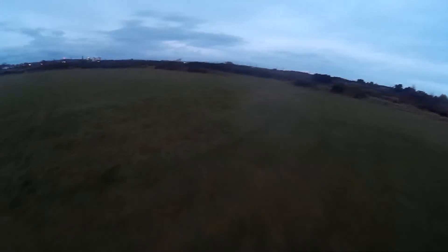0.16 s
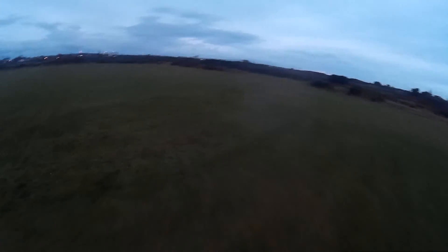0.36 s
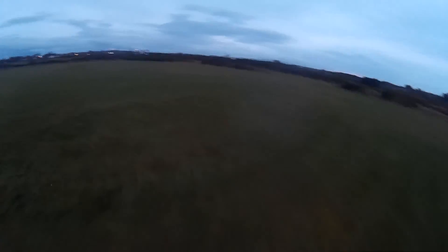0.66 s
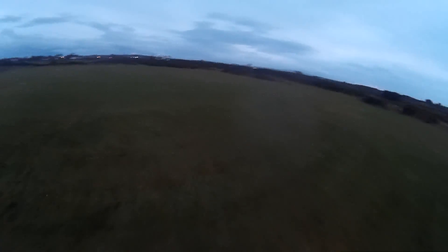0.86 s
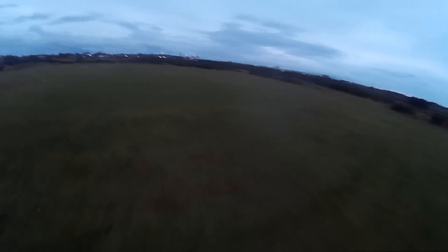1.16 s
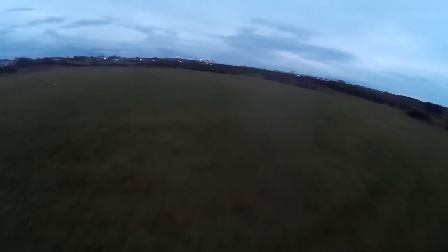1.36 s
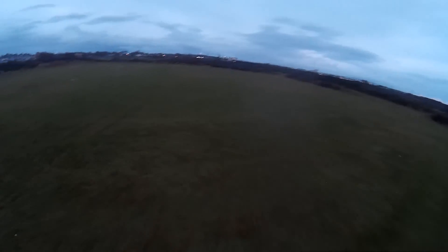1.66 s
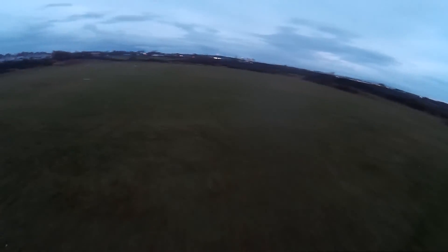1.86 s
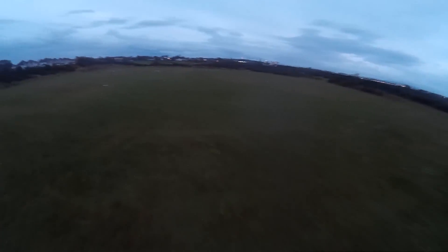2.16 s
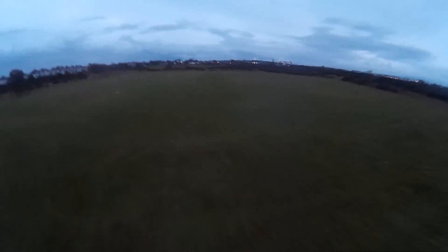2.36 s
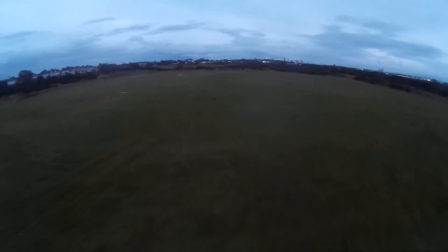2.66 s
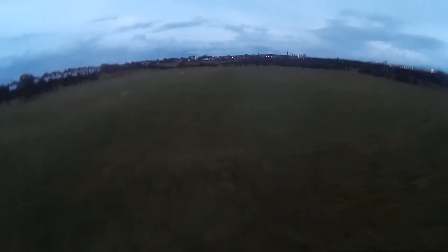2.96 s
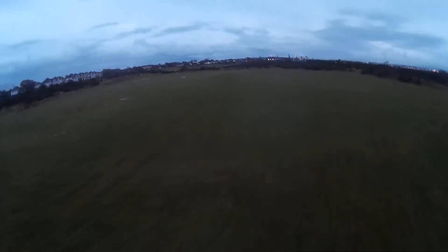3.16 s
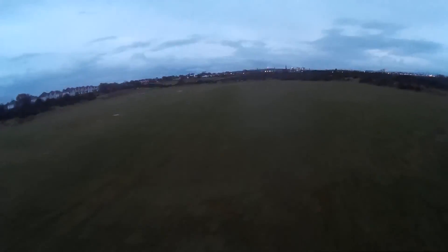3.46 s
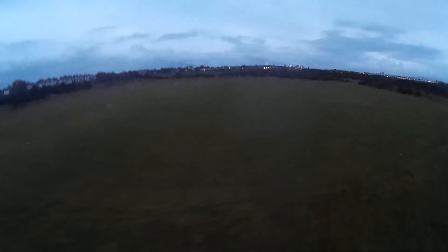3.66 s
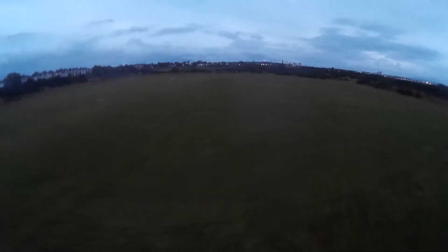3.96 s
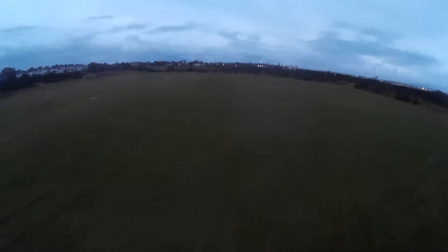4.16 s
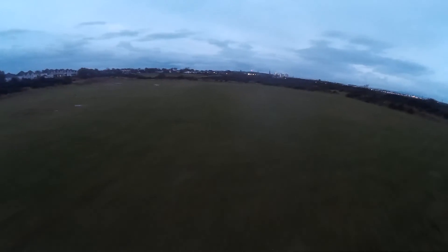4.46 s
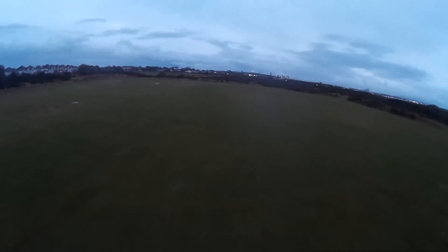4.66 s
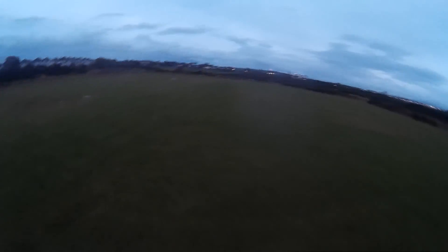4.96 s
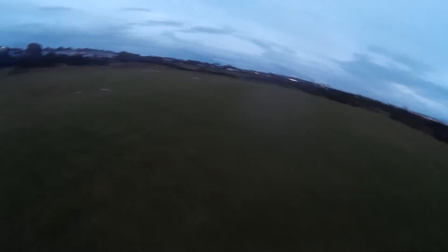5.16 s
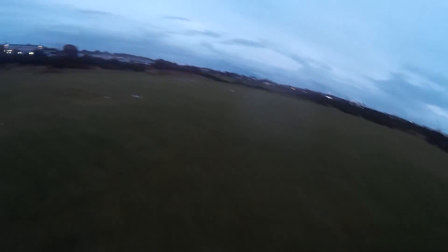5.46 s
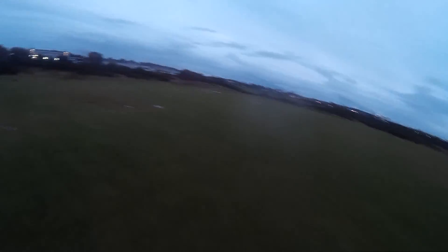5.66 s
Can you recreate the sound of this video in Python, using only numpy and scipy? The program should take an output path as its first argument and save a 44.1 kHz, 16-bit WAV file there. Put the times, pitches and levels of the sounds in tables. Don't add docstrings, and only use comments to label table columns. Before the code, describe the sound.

A small quadcopter flies over an open field, heard from its onboard microphone. Four rotors hum together at slightly different low pitches, beating and buzzing. The pitches spread apart during a turn as wind rumble grows, then close up as the gust drops. Small dry ticks and rattles of the camera mount run throughout, with airy propeller wash, very faint high electronic whine and two barely audible brief whistles.

```python
import sys
import numpy as np
from scipy import signal
from scipy.fft import rfft, irfft
from scipy.io import wavfile
from scipy.ndimage import uniform_filter1d

SR = 44100
rng = np.random.default_rng(int(sys.argv[2]) if len(sys.argv) > 2 else 0)


def waveform_to_disk(signal):
    frames = np.transpose(np.atleast_2d(signal))
    scaled = np.clip(frames, -1, 1) * 32767
    samples = np.round(scaled).astype(np.int16)
    wavfile.write(sys.argv[1], SR, samples)


def gain_from_db(level_db):
    decades = np.asarray(level_db, float) / 20
    return 10 ** decades


N = 256650
T = np.arange(N) / SR

# time in seconds, rate in Hz.
FRONT_LEFT = [(0, 199.7), (.5, 202.6), (.8, 208), (1.2, 208.4), (1.5, 201.8), (1.7, 212), (1.9, 216.4),
              (2.2, 213.2), (2.6, 215.3), (2.8, 221.7), (3.02, 214.5), (3.25, 219.6), (3.45, 212.5),
              (4.13, 213.7), (4.4, 205), (4.87, 197.9), (5.33, 210.5), (5.82, 204)]
FRONT_RIGHT = [(0, 203.1), (0.549, 206.9), (0.719, 201.3), (1.05, 196.3), (1.22, 198.7), (1.5, 195.6),
               (1.72, 197.5), (2.22, 184.8), (2.7, 186.7), (2.92, 181.8), (3.2, 181.6), (3.55, 186.9),
               (4.02, 189.1), (4.4, 207.3), (4.9, 208), (5.12, 203.5), (5.4, 212.9), (5.82, 204.7)]
REAR_LEFT = [(0, 178.5), (.4, 183.3), (.6, 184.6), (.9, 181.1), (1.1, 182), (1.45, 176.5), (1.7, 184.8),
             (1.92, 183), (2.4, 171.8), (2.82, 181.4), (3.28, 167.7), (3.7, 175.3), (4.02, 180.3),
             (4.3, 175.5), (4.62, 181.5), (4.87, 179.2), (5.15, 183.7), (5.82, 171.2)]
REAR_RIGHT = [(0, 148.7), (.3, 146.7), (.6, 151.5), (.8, 152), (1.12, 154.9), (1.45, 148.6), (1.701, 160.7),
              (2.252, 160.3), (2.45, 165.7), (2.7, 167.8), (3.15, 166.8), (3.6, 162.6), (3.9, 163.4),
              (4.102, 165.9), (4.32, 153), (4.649, 143.4), (5.35, 150.5), (5.82, 142.7)]
# cruise rate in Hz, lowest tone in dB, its gain with speed in dB per Hz,
# slap of the overtones in dB, slap lost in a gust in dB.
ROTORS = [
    (208, -23.5, -0.09, -27.5, 1.5),
    (202, -30.5, 0.08, -35.5, 3),
    (176.4, -28.5, 0.11, -31, 2),
    (155, -33.5, 0.08, -35.5, -0.5),
]
# overtones 2 to 7, in dB relative to its slap.
OVERTONES = [
    (-7, -5, -4.5, -13.5, -22.5, -20.5),
    (-7, -4, -2.5, -7.5, -11, -21.5),
    (-1, -4, -12.5, -30.5, -31, -30.5),
    (-9, -11.5, -3, -11, -13.5, -12),
]
# shaft orders 1, 3, 5 and 7 of one rotor, in dB.
UNBALANCE = [
    (-36, -67, -48, -49),
    (-43, -47.5, -45, -44),
    (-47, -49.5, -43.5, -43),
    (-52, -45.5, -47.5, -67.5),
]
# time in seconds, overtone lift in dB.
BITE = [(0, 1), (.45, -0.7), (.75, 2.9), (1.0, -0.6), (1.5, 2.1), (1.9, -0.5), (2.5, 0), (3.1, -2.7),
        (3.7, 0.3), (4.0, -2), (4.22, 0.5), (4.5, 2.8), (4.75, 2), (5.1, 0.7), (5.4, 4), (5.82, 0)]
BITE_SHARE = (1.16, 0.83, 0.5, 0.53)
# time in seconds, wind buffet in dB, blade wash in dB.
AIR = [
    (0.0, -42, -39.5),
    (0.1, -45, -36.5),
    (0.6, -37, -35),
    (1.38, -37.5, -34.5),
    (1.51, -32.5, -34),
    (2.9, -28, -35.5),
    (4.12, -32, -35),
    (4.28, -40.5, -35.5),
    (5.82, -47, -33.5),
]
# frequency in Hz, density in dB per Hz.
BUFFET = [(20, -5.5), (50, 2.5), (100, 2), (160, 1), (250, -4.5), (400, -5), (700, -38), (1200, -32),
          (2000, -59)]
WASH = [(40, -20.5), (120, -10.5), (250, -10.5), (450, -7.5), (700, -0.5), (1000, -4.5), (1400, -9),
        (2000, -16), (2500, -20.5), (3000, -32.5), (4000, -42), (6000, -63)]
HISS = [(3000, -32.5), (5000, 0.5), (6500, -6), (8500, -6), (9800, -7), (10500, 0.5), (11800, -3.5),
        (13300, -14), (14500, -9.5), (15800, -17)]
# frequency in Hz, width in Hz, level in dB.
CASE = [
    (3410, 430, 1),
    (4390, 330, -3),
    (4640, 250, -2),
    (6200, 2800, -22),
]
# time in seconds, peak in dB.
KNOCKS = [(.2263, -34), (0.5116, -30), (.8534, -30), (0.9082, -33), (1.1735, -31), (1.218, -33),
          (1.347, -31), (1.4824, -34), (1.6004, -32), (1.6771, -30), (2.023, -33), (2.2473, -30),
          (2.3726, -33), (2.3956, -27), (2.4079, -31), (2.5922, -31), (2.6092, -30), (3.0412, -33),
          (3.6909, -29), (3.7808, -31), (3.8818, -29), (4.0869, -34), (4.2764, -29), (4.3369, -31),
          (4.6628, -29), (4.6814, -28), (4.8925, -28), (4.8983, -27.5), (5.0573, -33), (5.5741, -32)]
# time in seconds, how much more often it taps in dB.
LOOSE = [(0, -6), (.22, 0), (.55, -7), (.8, 2), (1.3, 5), (1.75, -5.5), (1.95, 6), (2.12, -1), (2.3, 6.5),
         (2.62, 6.5), (2.9, -4), (3.3, 4), (3.7, 5.5), (3.95, -6), (4.7, 2.5), (5.17, -7), (5.4, 6),
         (5.82, -1)]
# start and length in seconds, first and last pitch in Hz, level in dB.
WHISTLES = [
    (3.32, .17, 4740, 4780, -52),
    (5.7, .16, 4810, 4770, -54),
]
# pitch in Hz, second at which it swings in step with the first, level and octave level in dB.
WHINE_HZ, IN_STEP = (7819.89, 7824.68, 7823.47, 7811.85), (0, .119, .242, .072)
WHINE_DB, OCTAVE_DB = (-69.3, -69, -80, -78.5), (-92, -102, -88, -94)
ARM_HZ, ARM_WIDTH_HZ, ARM_DB = 586, 17, (0.5, 10.5, 0.3, 3)
HUNT_S, HUNT_PER_S, HUNT_HZ = 4.43, 5.15, 3.5
WANDER_DB, WANDER_HZ = 1.08, 1.9
TAP_CHANCE, TAP_DB, TAP_SPREAD_DB = .16, -41, 3.5
HISS_DB = -63


def evened(x):
    return x / np.sqrt(np.mean(x ** 2) + 1e-20)


def column(values):
    return np.array(values)[:, None]


def curves(rows):
    s, *columns = np.transpose(rows)
    return np.array([np.interp(T, s, c) for c in columns])


def drift(top_hz, count):
    steps = rng.standard_normal((count, N // 64 + 2))
    length = steps.shape[1]
    z = rfft(steps) / (1 + (np.fft.rfftfreq(length, 64 / SR) / top_hz) ** 4)
    s = np.arange(length) * 64 / SR
    return np.array([np.interp(T, s, evened(v)) for v in irfft(z, length)])


def noise(spectrum, patchy_db, size=1024):
    hz = np.fft.rfftfreq(size, 1 / SR)
    f, db = np.transpose(spectrum)
    a, b, patches = rng.standard_normal((4 * N // size + 5, len(hz), 3)).T
    patches = evened(uniform_filter1d(uniform_filter1d(patches, 10, 0), 10, 1))
    colour_db = np.interp(np.log(hz + 1), np.log(f + 1), db, left=-60, right=-120)
    z = (a + 1j * b) * gain_from_db(colour_db[:, None] + patchy_db * patches)
    return signal.istft(z, nperseg=size, noverlap=size * 3 // 4)[1][:N]


def band_rms(x, lo, hi):
    return np.std(signal.sosfilt(signal.butter(4, [lo, hi], "band", fs=SR, output="sos"), x))


def speeds():
    hunting = HUNT_HZ * np.sin(2 * np.pi * HUNT_PER_S * np.maximum(T - HUNT_S, 0))
    rates = np.vstack([curves(rows) for rows in (FRONT_LEFT, FRONT_RIGHT, REAR_LEFT, REAR_RIGHT)])
    return rates + hunting * column([0, 1, 0, 0])


def loads(rates, gust):
    cruise_hz, tone_db, db_per_hz, slap_db, lost_db = np.transpose(ROTORS)[:, :, None]
    wander_db = WANDER_DB * drift(WANDER_HZ, count=8)
    thrust = tone_db + db_per_hz * (rates - cruise_hz) + wander_db[:4]
    slap = slap_db + column(BITE_SHARE) * curves(BITE) - lost_db * gust + wander_db[4:]
    return thrust, slap


def blade_tones(rates, turns, gust):
    thrust, slap = loads(rates, gust)
    orders = np.r_[1:8, .5:4][:, None]
    out = np.zeros(N)
    for k in range(4):
        overtones_db = slap[k] + column(OVERTONES[k]) - gust * column([.3, -1.2, 3.6, 2.6, 2.6, 2.6])
        unbalance_db = column(UNBALANCE[k]) + 2.3 * gust
        level_db = np.vstack([thrust[k] - .4, overtones_db, unbalance_db])
        level_db = level_db + ARM_DB[k] / (1 + ((orders * rates[k] - ARM_HZ) / ARM_WIDTH_HZ) ** 2)
        flicker_db = (0.58 + 0.3 * gust) * np.minimum(orders, 2) * drift(10.8, count=11)
        shake = .03 * drift(6.0, count=1)
        blur = (.01 + .008 * gust) * drift(12.0, count=11)
        phase = (turns[k] + shake) * orders + rng.random((11, 1)) + blur
        out += np.sqrt(2) * (gain_from_db(level_db + flicker_db) * np.cos(2 * np.pi * phase)).sum(0)
    return out


def wake_tones(turns):
    pairs = np.array([turns[a] + turns[b] for a, b in ((0, 1), (0, 2), (1, 2), (0, 3), (2, 3))])
    level_db = column([-42, -42, -46, -46, -47]) + 2.0 * drift(7.3, count=5)
    tones = gain_from_db(level_db) * np.cos(2 * np.pi * (pairs + rng.random((5, 1))))
    return np.sqrt(2) * tones.sum(0)


def chop(turns, depth):
    sweeps = column([1, .7, .8, .5]) * np.cos(2 * np.pi * turns)
    return evened(np.exp(depth * sweeps.sum(0)))


def airflow(turns):
    buffet_db, wash_db = curves(AIR)
    buffet = noise(BUFFET, 0.91, size=2048)
    buffet *= gain_from_db(buffet_db + drift(3.0, count=1)[0]) / band_rms(buffet, 21, 87.0)
    wash = noise(WASH, 1.0)
    wash *= gain_from_db(wash_db - 0.6) * chop(turns, depth=0.1) / band_rms(wash, 1097, 3100)
    hiss = evened(noise(HISS, .7, size=512)) * chop(turns, depth=0.11)
    return buffet + wash + gain_from_db(HISS_DB + .4 * drift(3.0, count=1)[0]) * hiss


def whine(turns):
    out = np.zeros(N)
    for k, rotor in enumerate((2, 0, 1, 3)):
        phase = 2 * np.pi * (WHINE_HZ[k] * T - (WHINE_HZ[k] - WHINE_HZ[0]) * IN_STEP[k])
        turning = 1 + 0.33 * np.cos(2 * np.pi * turns[rotor]) + .25 * np.cos(np.pi * turns[rotor])
        out += turning * (gain_from_db(WHINE_DB[k]) * np.cos(phase) + gain_from_db(OCTAVE_DB[k]) * np.cos(2 * phase))
    return out


def case(x):
    out = np.zeros(N)
    for k, (hz, width, db) in enumerate(CASE):
        r = np.exp(-np.pi * width / SR)
        angle = 2 * np.pi * hz / SR
        ring = signal.lfilter([np.sin(angle)], [1, -2 * r * np.cos(angle), r * r], x)
        out += (-1) ** k * gain_from_db(db) * ring
    return out


def taps(turns, spells):
    passing = np.diff(np.floor(turns), prepend=0) > 0
    struck = passing * (rng.random(N) < TAP_CHANCE * spells)
    return gain_from_db(TAP_DB + TAP_SPREAD_DB * rng.standard_normal(N)) * struck


def mount_tick():
    t = np.arange(-100, 101) / SR
    width = np.where(t < 0, .00021, .0003)
    body = np.exp(-.5 * (t / width) ** 2) * np.cos(2 * np.pi * 4200 * t)
    edge = np.exp(-.5 * (t / 0.00015) ** 2) * np.cos(2 * np.pi * 6700 * t)
    return body + gain_from_db(-19.0) * edge


def rattle(turns):
    knocks = np.zeros(N)
    for s, db in KNOCKS:
        knocks[round(s * SR)] = gain_from_db(db - 1.3)
    spells = gain_from_db(curves(LOOSE)[0]) * np.exp(0.25 * drift(14.0, count=1)[0])
    faint = gain_from_db(-54 + 2.9 * np.minimum(rng.exponential(1, N), 3.5))
    faint = faint * (rng.random(N) < 520 * spells ** .6 / SR)
    ticks = signal.oaconvolve(knocks + taps(turns[2], spells) + faint, mount_tick(), "same")
    air = gain_from_db(-65.5 + 1.5 * drift(28.0, count=1)[0]) * chop(turns, depth=0.21) * rng.standard_normal(N)
    rung = signal.sosfilt(signal.butter(3, 2700, "high", fs=SR, output="sos"), case(air))
    return rung + ticks


def whistles():
    out = np.zeros(N)
    for s, length, hz, end_hz, db in WHISTLES:
        u = np.clip((T - s) / length, 0, 1)
        pitch = hz + (end_hz - hz) * u + 2.3 * drift(30.0, count=1)[0]
        out += gain_from_db(db) * np.sin(np.pi * u) ** 0.52 * np.cos(2 * np.pi * np.cumsum(pitch) / SR)
    return out


def scene():
    rates = speeds()
    turns = np.cumsum(rates, 1) / SR
    gust = np.clip((curves(AIR)[0] + 38) / 10, 0, 1.5)
    tones = blade_tones(rates, turns, gust) + wake_tones(turns) + whine(turns)
    mix = tones + airflow(turns) + rattle(turns) + whistles()
    return mix[None]


def top_cut(x):
    return signal.sosfilt(signal.butter(12, 15750, fs=SR, output="sos"), x)


def record(dry):
    return top_cut(1.2 * np.tanh(dry / 1.2))


dry = scene()
out = record(dry)
waveform_to_disk(out)
```